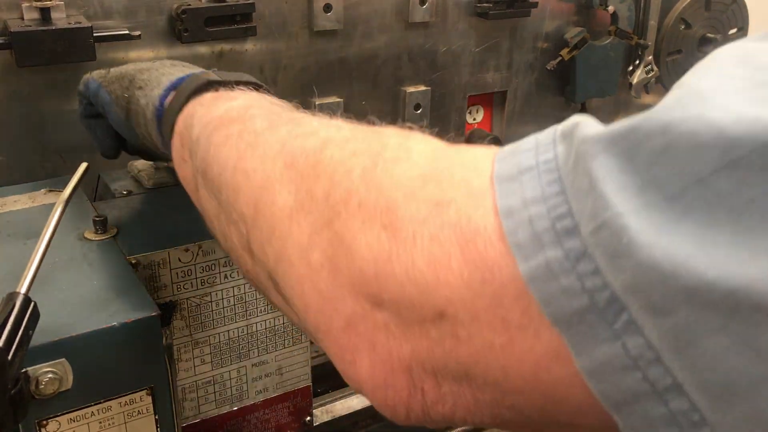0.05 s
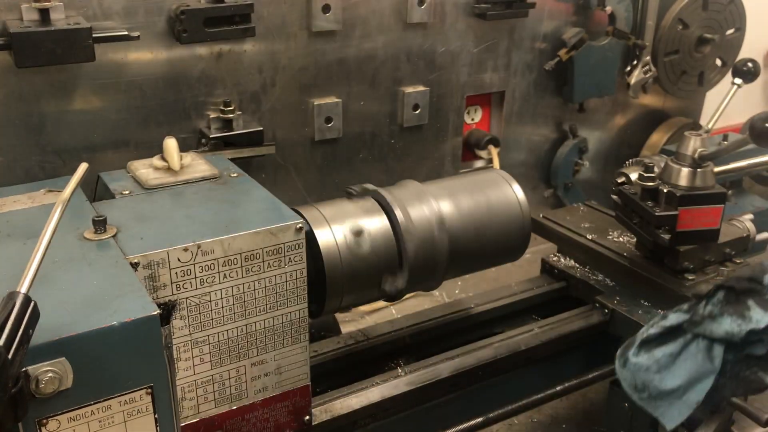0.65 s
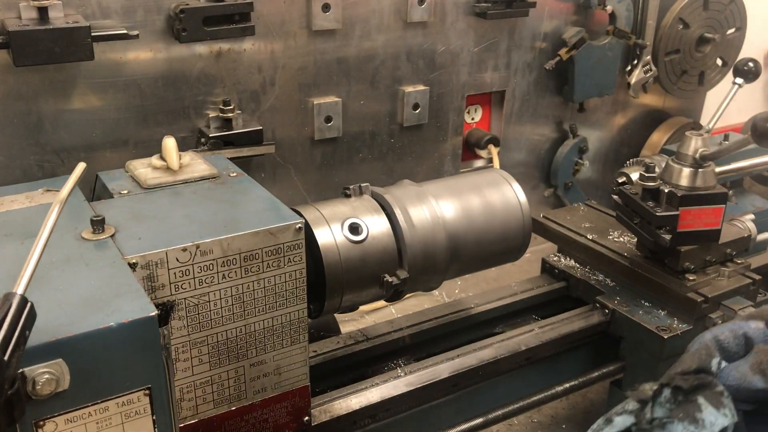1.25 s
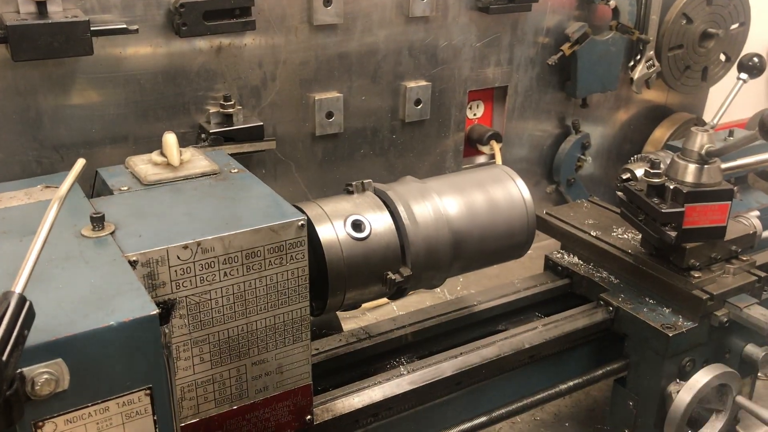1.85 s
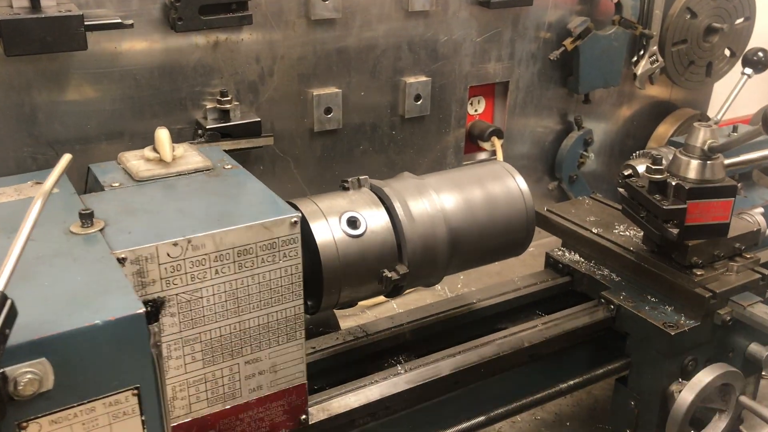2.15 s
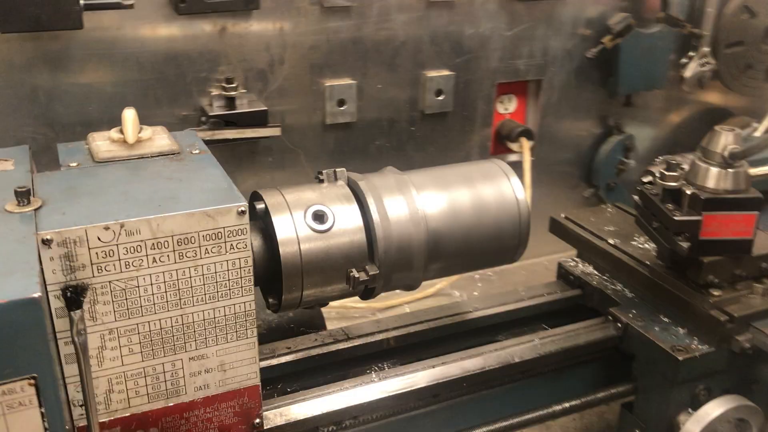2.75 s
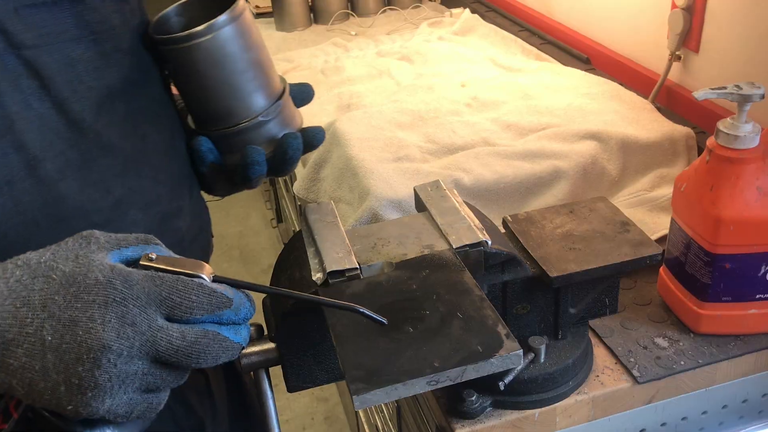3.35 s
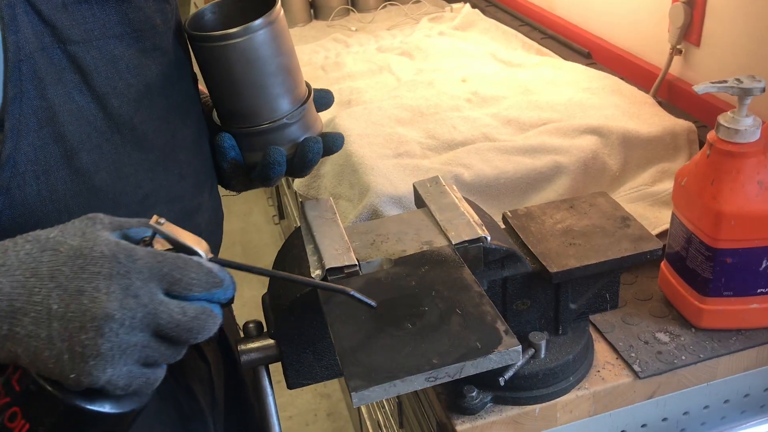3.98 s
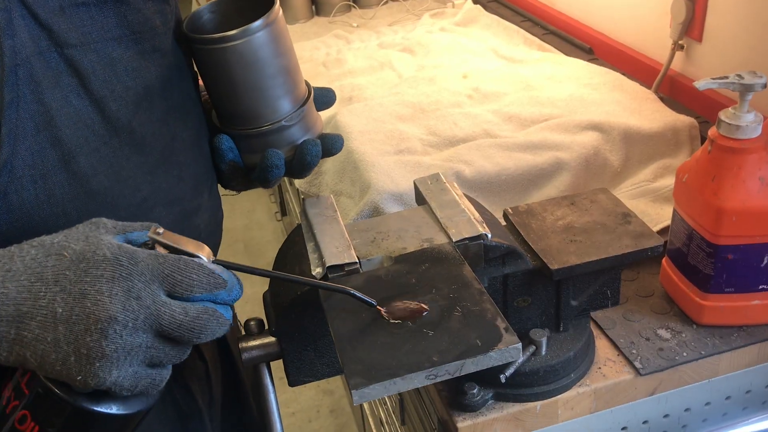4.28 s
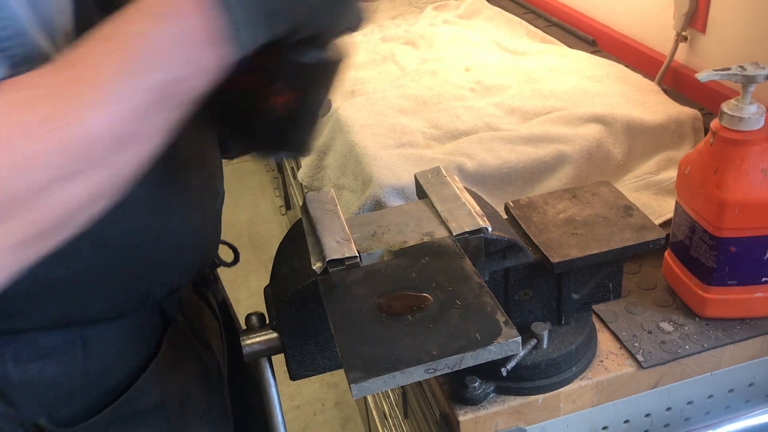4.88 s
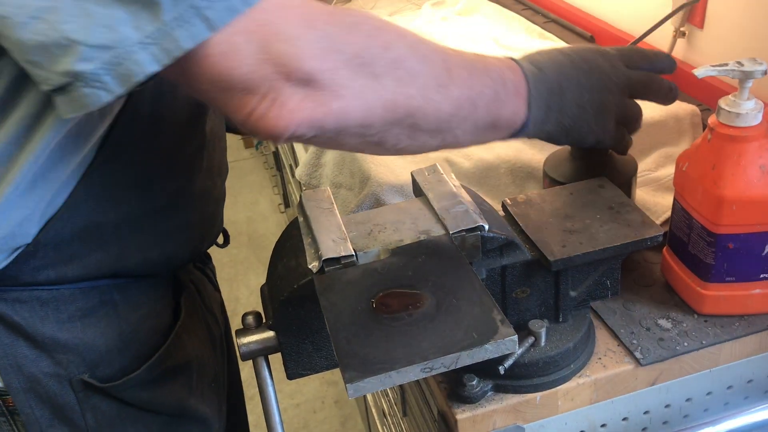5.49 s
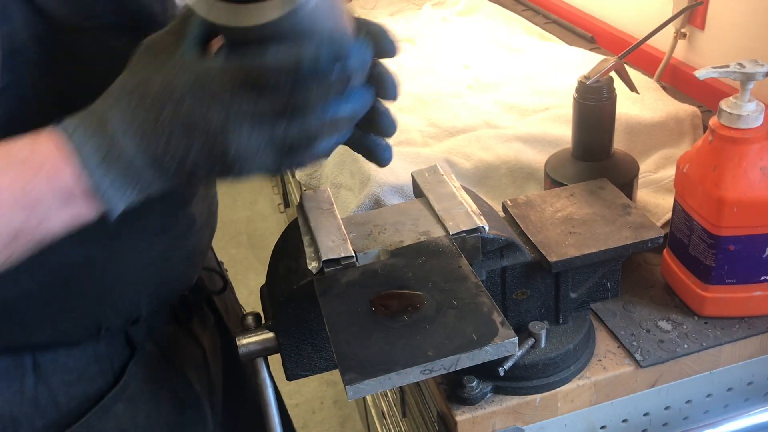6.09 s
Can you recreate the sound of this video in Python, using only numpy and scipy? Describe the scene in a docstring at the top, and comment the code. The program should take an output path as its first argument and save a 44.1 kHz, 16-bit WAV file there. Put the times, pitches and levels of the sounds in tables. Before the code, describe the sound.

Lathe gears slow from a whine to a fading drone, with light clinks and one metallic clack. After some quiet clothing rustle and padded knocks, the lever of a nearby oil can gives three sharp, tinny snaps, with a brief sputter of oil before the last. Muffled handling knocks follow, then a thud as the can lands on steel. A low rumble and faint hiss fill the small workshop.

```python
"""Lathe run-down and oil can.

A metal lathe coasts to a stop in a small workshop: gear teeth rattle the headstock, a steel part clacks.
Work clothes rustle. At the bench a pump oil can snaps three times and spits oil, is shifted in a gloved
hand and set down on steel with a faint ring. A low rumble lies under it all."""
import sys
import numpy as np
from scipy import signal
from scipy.fft import rfft, irfft, next_fast_len
from scipy.io import wavfile
from scipy.ndimage import uniform_filter1d

SR = 44100
rng = np.random.default_rng(int(sys.argv[2]) if len(sys.argv) > 2 else 0)


def pcm_store(signal):
    """Save signal as 16-bit PCM."""
    levels = np.round(np.clip(np.atleast_2d(signal), -1, 1) * 32767)
    wavfile.write(sys.argv[1], SR, levels.astype(np.int16).T)


N = 274729
T = np.arange(N) / SR
AGE = T[:SR // 2]  # seconds since an event began


def undb(db):
    """Decibels to gain."""
    return 10 ** (np.asarray(db) / 20)


def unit(x):
    """Scale to rms 1."""
    return x / np.sqrt(np.mean(x ** 2))


def add(out, start_s, x):
    """Mix a sound in at a given time."""
    i = int(start_s * SR)
    out[i:i + len(x)] += x[:N - i]


def colour(x, points):
    """Minimum-phase filter of unit power through (Hz, dB) points."""
    size = next_fast_len(2 * len(x))
    hz, db = np.transpose(points)
    bins_hz = np.maximum(np.arange(size // 2 + 1) * SR / size, 1)
    gain = unit(undb(np.interp(np.log(bins_hz), np.log(hz), db)))
    cepstrum = irfft(np.log(gain), size)
    cepstrum[1:size // 2] *= 2
    cepstrum[size // 2 + 1:] = 0
    return irfft(rfft(x, size) * np.exp(rfft(cepstrum)), size)[:len(x)]


def split(x, hz):
    """The parts of a sound below and above a frequency."""
    low = signal.sosfiltfilt(signal.butter(2, hz, fs=SR, output="sos"), x, padtype=None)
    return low, x - low


def resonate(x, hz, width_hz):
    """One resonance, gain 1 at its centre."""
    return signal.lfilter(*signal.iirpeak(hz, hz / width_hz, fs=SR), x)


def ring(modes, tuning=1, jitter=0.00079):
    """Struck (Hz, dB, t60 s) modes; neighbours swing in opposite senses, so the ring builds briefly."""
    detune = tuning * (1 + jitter * rng.standard_normal(len(modes)))
    out = 0
    for k, (hz, db, t60_s) in enumerate(modes):
        decay = np.exp(-np.log(1000) * AGE / t60_s)
        out += (-1) ** k * undb(db) * np.sin(2 * np.pi * hz * detune[k] * AGE) * decay
    return out


def burst(decay_s):
    """A rush of tiny contacts that dies away."""
    return rng.standard_normal(len(AGE)) * np.exp(-AGE / decay_s)


def walk(per_s):
    """Smooth random drift with a spread near 1."""
    knots = rng.standard_normal(N // 50)
    return uniform_filter1d(np.interp(T * per_s, np.arange(len(knots)), knots), size=200)


def grains(per_s, spread_db):
    """Random clicks of unequal size, rms 1."""
    clicks = (rng.random(N) < per_s / SR) * rng.standard_normal(N)
    return unit(clicks * undb(spread_db * rng.standard_normal(N)))


def gate(start_s, end_s, fade_s):
    """1 between two times, fading outside them."""
    return np.clip(1 + np.minimum(T - start_s, end_s - T) / fade_s, 0, 1)


def scatter(start_s, end_s, per_s, spread_db):
    """Loosely spaced events of unequal size, as (s, dB) rows."""
    gaps, sizes = rng.standard_normal((40, 2)).T
    times = start_s + np.cumsum(np.exp(0.35 * gaps)) / per_s
    return [(s, spread_db * size) for s, size in zip(times, sizes) if s < end_s]


def room(x, near_db, far_db, near_t60_s=0.071, far_t60_s=1.0, treble_t60_s=0.18, gap_s=0.0032):
    """Quick reflections from nearby surfaces, then the workshop's tail, whose treble dies first."""
    low, high = split(rng.standard_normal(len(AGE)), 5000)
    fall = -np.log(1000) * AGE
    near = rng.standard_normal(len(AGE)) * np.exp(fall / near_t60_s) * (AGE > gap_s)
    far = (low * np.exp(fall / far_t60_s) + high * np.exp(fall / treble_t60_s)) * (AGE > 2 * gap_s)
    echoes = (undb(near_db) * unit(near) + undb(far_db) * unit(far)) / np.sqrt(len(AGE))
    return x + signal.fftconvolve(x, echoes)[:N]


# Spectra of rumble, low flutter and shop hiss. Each row: frequency in Hz, relative density in dB.
RUMBLE_SPECTRUM = [(8, -14), (16, 11.5), (28, 2), (55, -6.5), (85, -10), (130, -21.5), (220, -24.5),
                   (320, -45.5), (2000, -110)]
FLUTTER_SPECTRUM = [(12, -16), (28, 0), (55, -2), (90, -6), (130, -10.5), (200, -25), (400, -58),
                    (2000, -110)]
HISS_SPECTRUM = [(88, -30), (150, -18), (159, -9.5), (361, -8), (406, -14.5), (821, -12), (1040, -17.5),
                 (13400, -40), (14800, -54)]
# Spells of moving about. Each row: start and end in seconds, cloth rustle in dB, flutter in dB.
MOVING = [(0, 1.456, -66, -56), (1.542, 3.207, -62, -51), (4.62, 6.23, -59, -53.5)]


def background():
    """A deep unsteady rumble, fuller while someone moves, under the faint hiss of the shop."""
    rumble = unit(colour(rng.standard_normal(N), RUMBLE_SPECTRUM)) * undb(-45.5 + 3 * walk(per_s=3.1))
    moving = sum(undb(db) * gate(start_s, end_s, fade_s=0.087) for start_s, end_s, _, db in MOVING)
    flutter = unit(colour(rng.standard_normal(N), FLUTTER_SPECTRUM)) * moving
    hiss = unit(colour(rng.standard_normal(N), HISS_SPECTRUM)) * undb(-66.5 + 0.6 * walk(per_s=4.3))
    return rumble + flutter + hiss


# Arm movements. Each row: peak time in seconds, level in dB, build-up in seconds, relative swish in dB.
GESTURES = [(1.03, -57.5, 0.2, -21), (1.849, -41.5, 0.12, -18.5), (2.4, -55.5, 0.11, -18),
            (2.668, -49, 0.079, -14), (3.12, -58, 0.13, -11), (4.82, -67, 0.045, 5.5),
            (4.94, -47.5, 0.061, -19), (5.142, -44.5, 0.049, -16.5), (5.27, -56.5, 0.073, -11.5),
            (5.61, -55.5, 0.064, -12.5), (5.785, -48.5, 0.053, -23), (5.987, -45.5, 0.058, -12),
            (6.21, -56, 0.12, -7.5)]
# Rubbing fabric. Each row: frequency in Hz, relative density in dB.
CLOTH_SPECTRUM = [(60, -16.5), (130, 3.5), (260, -3), (600, -9.5), (1200, -17.5), (3500, -28),
                  (8000, -39.5), (15000, -56)]


def cloth():
    """Fibres catch and let go in dense grains, a soft swish above; each arm movement builds and settles."""
    settle_ratio, roundness = 0.47, 1.08  # fall time over build-up; 1 is pointed, 2 a bell
    rub = sum(undb(db) * gate(start_s, end_s, fade_s=0.073) for start_s, end_s, db, _ in MOVING)
    swish = undb(-14) * rub
    for peak_s, db, build_s, swish_db in GESTURES:
        from_peak = np.maximum(peak_s - T, (T - peak_s) / settle_ratio) / build_s
        swell = undb(db) * np.exp(-from_peak ** roundness)
        rub = np.hypot(rub, swell)
        swish = np.hypot(swish, undb(swish_db) * swell)
    fibres = grains(per_s=3000, spread_db=1.5) * undb(2 * walk(per_s=55))
    low, high = split(colour(fibres, CLOTH_SPECTRUM), 1530)
    return rub * unit(low) + swish * unit(high)


# Knocks of glove and can. Each row: start in seconds, level in dB, contact in seconds, relative scuff in dB.
BUMPS = [(1.69, -39, 0.0014, -7.5), (1.788, -38, 0.00052, -20), (1.885, -30, 0.00073, -15.5),
         (1.906, -36, 0.00049, -25), (2.467, -44.5, 0.00057, -12.5), (4.954, -30, 0.0008, -11),
         (5.1089, -27, 0.00089, -12), (5.1156, -30.5, 0.00077, -8), (5.203, -30.5, 0.00055, -16.5),
         (5.281, -37, 0.00091, -27), (5.3442, -40, 0.00029, -4.5), (5.3505, -27.5, .0005, -22),
         (5.367, -16, .001, -29), (5.377, -28, 0.0004, -17), (5.785, -38, 0.00123, -22),
         (5.972, -32.5, 0.00047, -23)]


def bumps():
    """Padded contacts: one push and rebound, a low thud, a short dull shudder and a scuff of fabric."""
    shudder_spectrum = [(120, -8), (300, 3), (600, 8), (900, -6.5), (1600, -29), (6000, -58)]
    scuff_spectrum = [(200, 6), (900, 5), (3500, -5), (7000, -18.5), (15000, -38)]
    out = np.zeros(N)
    for start_s, db, contact_s, scuff_db in BUMPS:
        pulse_time = AGE / contact_s - 2
        push = -2 * pulse_time * np.exp(-pulse_time ** 2)
        thud = ring([(108.6, -9.5, 0.089), (184, -16.5, 0.037)])
        shudder = undb(-6.5) * colour(burst(decay_s=0.0032), shudder_spectrum)
        scuff = undb(scuff_db) * colour(burst(decay_s=0.0043), scuff_spectrum)
        add(out, start_s, undb(db) * (push + thud + shudder + scuff))
    return out


# Steel under the can. Each row: frequency in Hz, level in dB, t60 in seconds.
STEEL_MODES = [(1022, 6, 0.28), (1090, -1, 0.14), (1180, -11.5, 0.74), (2000, -14, 0.45), (3365, -27, 0.27),
               (3520, -14, 0.33)]


def set_down(start_s=5.4235, rise_s=0.0058):
    """The can's rim scrapes onto the steel, which rings faintly."""
    rim_spectrum = [(500, -22), (1500, -8), (2900, 4), (5000, -10), (8000, -22), (9700, -17), (14000, -34)]
    scrape = undb(-47) * colour(burst(decay_s=0.011), rim_spectrum)
    steel = undb(-49) * ring(STEEL_MODES) * (1 - np.exp(-AGE / rise_s))
    out = np.zeros(N)
    add(out, start_s, scrape + steel)
    return out


# Large air pockets. Each row: start in seconds, level in dB, decay in seconds.
SPITS = [(4.2236, -34.5, 0.011), (4.249, -32, 0.0045), (4.322, -35, 0.0031)]
# Spitting spout. Each row: frequency in Hz, relative density in dB.
SPIT_SPECTRUM = [(180, -20.5), (300, -2.5), (624, -19), (946, -11), (2250, -13), (3640, -4), (5520, -13.5),
                 (6960, -7), (8220, -19), (11300, -22), (16000, -38)]


def spits(sputter_db=-49):
    """Air pockets burst at the spout as oil comes out: a few large ones amid a sputter of small ones."""
    out = np.zeros(N)
    for start_s, db, decay_s in SPITS:
        add(out, start_s, undb(db) * burst(decay_s))
    pop = burst(decay_s=0.0034)
    for start_s, size_db in scatter(start_s=4.23, end_s=4.35, per_s=110, spread_db=1.5):
        add(out, start_s, undb(sputter_db + size_db) * pop)
    return colour(out, SPIT_SPECTRUM)


# Plunger sliding in its barrel. Each row: start and end in seconds, level in dB.
SLIDES = [(3.541, 3.616, -53.5), (3.679, 3.73, -54), (3.927, 4.016, -53.5), (4.075, 4.11, -50.5),
          (4.395, 4.423, -45)]
# Lever catching as a stroke begins. Each row: start in seconds, level in dB, relative treble in dB.
LEVER_CATCHES = [(3.5365, -48.5, -2), (3.6905, -39, -4.5), (3.9315, -37.5, -6.5)]
# Spectra of scrape and tick. Each row: frequency in Hz, relative density in dB.
SLIDE_SPECTRUM = [(200, -21.5), (300, 3), (700, -14), (1100, 2.5), (2100, -15), (3100, -3.5), (3900, 3.5),
                  (5000, -36), (7000, -22.5), (15000, -41.5)]
TICK_SPECTRUM = [(250, -28.5), (700, -12), (1100, -15), (2100, -12.5), (3500, -0.5), (4200, -3.5),
                 (5600, -12), (7000, -8.5), (8800, -24.5), (10500, -18), (11500, -27), (15000, -30)]


def pump(spring_over_slide_db=3.5, spring_treble_db=-4.5, fade_s=0.0056):
    """The plunger scrapes along in tiny slips while the lever catches and the spring ticks."""
    stroke, ticks, catches = np.zeros(N), np.zeros(N), list(LEVER_CATCHES)
    for start_s, end_s, db in SLIDES:
        stroke += undb(db) * np.clip(np.minimum(T - start_s, end_s - T) / fade_s, 0, 1)
        for tick_s, size_db in scatter(start_s, end_s, per_s=46, spread_db=1.5):
            catches.append((tick_s, db + spring_over_slide_db + size_db, spring_treble_db))
    low, high = split(colour(burst(decay_s=0.0056), TICK_SPECTRUM), 5450)
    for start_s, db, treble_db in catches:
        add(ticks, start_s, undb(db) * (low + undb(treble_db) * high))
    slips = unit(colour(grains(per_s=2500, spread_db=8), SLIDE_SPECTRUM))
    return ticks + stroke * slips


# Lever snaps. Each row: start in seconds, level in dB, relative boom in dB, tuning ratio.
SNAPS = [(3.716, -16, 2.5, 1.008), (4.1010, -12, -1.5, 0.98), (4.4134, -11.5, 1, .998)]
# The can's bottom, spout and lever. Each row: frequency in Hz, level in dB, t60 in seconds.
CAN_MODES = [(250, -22.5, 0.15), (286, -10.5, 0.17), (338.3, -13, 0.081), (385, -15.5, 0.06),
             (447.7, -19, 0.095), (708, -22.5, 0.031), (920, -18, 0.047), (1055, -20, .06),
             (1330, -36.5, 0.052), (2205, -24, 0.03), (2710, -19.5, 0.043), (3017, -11, 0.033),
             (3410, -7, 0.02), (3726, -1.5, 0.039), (3944, -3, .022), (4290, -13, 0.053),
             (4610, -24, 0.054), (5660, -27.5, 0.028), (6420, -11.5, .028), (6900, -18.5, 0.032),
             (7270, -19.5, 0.03), (9330, -24.5, 0.023), (10060, -23, 0.019)]
# Spectra of the impact and of loose parts. Each row: frequency in Hz, relative density in dB.
CRACK_SPECTRUM = [(190, -28), (330, -0.5), (1000, -7.5), (1800, -20), (3600, 6), (5000, -1), (7000, -9),
                  (10000, -13.5), (15000, -31.5)]
SHIVER_SPECTRUM = [(290, -37.5), (500, 7), (766, -9.5), (1130, 2.5), (1470, -15.5), (1800, -9),
                   (2430, -15.5), (2570, -3), (3230, -15), (3880, -6), (4600, -14.5), (6480, -14),
                   (7910, -33), (9510, -28.5), (15000, -60.5)]


def oil_can():
    """The lever hits its stop: spout and lever ring, the thin bottom booms, loose parts shiver on."""
    out = np.zeros(N)
    for start_s, db, boom_db, tuning in SNAPS:
        crack = undb(-13.5) * colour(burst(decay_s=0.0069), CRACK_SPECTRUM)
        shiver = undb(-15.5) * colour(burst(decay_s=0.022), SHIVER_SPECTRUM)
        bottom, lever = split(ring(CAN_MODES, tuning, jitter=0.002) + crack + shiver, 650)
        add(out, start_s, undb(db) * (undb(boom_db) * bottom + lever))
    return out


# Squeaks and clinks in the lathe.
# Each row: start in seconds, level in dB, frequency in Hz, bandwidth in Hz, decay in seconds.
CLINKS = [(0.254, -56, 7100, 400, 0.008), (0.302, -53.5, 7080, 200, .01), (0.552, -54, 4500, 120, 0.019),
          (0.622, -44.5, 6560, 600, 0.018), (.7595, -41.5, 3340, 700, 0.0048),
          (0.762, -45.5, 1120, 300, 0.0072), (0.784, -68, 2950, 40, 0.11),
          (0.897, -53.5, 2600, 900, 0.0035)]


def clinks():
    """Small steel parts touch or rub, each sounding one note."""
    out = np.zeros(N)
    for start_s, db, hz, width_hz, decay_s in CLINKS:
        note = resonate(resonate(burst(decay_s), hz, width_hz), hz, hz / 2)
        makeup_gain = np.sqrt(SR / (np.pi * width_hz))
        add(out, start_s, undb(db) * makeup_gain * note)
    return out


# Clacks of the halting spindle. Each row: start in seconds, level in dB, rattle decay in seconds.
CLACKS = [(0.632, -25.5, 0.011), (0.641, -38.5, 0.014)]
# Rattle of the loose parts. Each row: frequency in Hz, relative density in dB.
CLACK_SPECTRUM = [(600, -36), (950, 3.5), (1600, -1), (2100, 7), (2500, 0.5), (3500, -0.5), (4900, -3),
                  (5900, 3), (7200, -1.5), (8000, -8.5), (16000, -39)]
# Their ring. Each row: frequency in Hz, level in dB, t60 in seconds.
CLACK_MODES = [(997, -14.5, 0.18), (2030, -16, 0.061), (2068, 1.5, 0.061), (2910, -25, .1),
               (3474, -4, 0.044), (3870, -21, 0.098), (4740, -27, 0.088), (6000, -15, 0.055),
               (6665, -20, .07), (6970, -10, 0.047)]


def clacks(rise_s=0.0021):
    """Loose steel parts rattle briefly and ring as the spindle runs down."""
    out = np.zeros(N)
    for start_s, db, decay_s in CLACKS:
        clack = colour(burst(decay_s), CLACK_SPECTRUM) + ring(CLACK_MODES)
        add(out, start_s, undb(db) * clack * (1 - np.exp(-AGE / rise_s)))
    return out


# Fixed notes of the running lathe: low electric hum tones and ringing headstock resonances.
# Each row: frequency in Hz, level in dB.
LATHE_NOTES = [(120, -10.5), (236, -8.5), (328, -7.5), (359, -3), (479, -10), (572, -2), (730, -9.5),
               (776, -22), (945, 0.5), (1131, -13.5), (1477, -30), (1840, 0), (1902, 2.5), (2089, -12),
               (2256, -5), (2305, -3.5), (2590, -12), (2970, -14), (3520, -17), (3860, -20.5)]
# Broad response of the casting. Each row: frequency in Hz, relative density in dB.
CASTING_SPECTRUM = [(100, -17), (200, -2), (270, -4), (330, 1.5), (410, -1), (550, 1.5), (900, -2),
                    (1250, -10), (1650, -6.5), (1900, -7), (2700, -20.5), (3900, -18), (4600, -27.5),
                    (7200, -34), (14000, -60)]


def hum_and_ring(force):
    """Narrow bands of the force give hum tones and headstock ring, each wavering, over the casting."""
    notes = 0
    for hz, db in LATHE_NOTES:
        width_hz = 26 + hz / 70
        band = resonate(resonate(force, hz, width_hz), hz, width_hz)
        notes += undb(db + 2 * walk(per_s=11.8)) * band
    return unit(notes) + undb(-1) * unit(colour(force, CASTING_SPECTRUM))


def lathe(full_mesh_hz=384.6, rest_s=1.06):
    """Friction slows the gears evenly to rest; their teeth strike unevenly and chatter in the backlash."""
    rattle_hz, scatter_s = 117, 0.001  # the rattle fades below this mesh rate; smear of one blow
    gear_teeth, tight_tooth, tight_swell_db = 50.7, 17, 1  # one gear runs tight once a turn
    speed = np.maximum(1 - T / rest_s, 1e-4)
    mesh_hz = full_mesh_hz * speed
    teeth = np.cumsum(mesh_hz * (1 + 0.04 * walk(per_s=110))) / SR
    contacts = np.diff(np.floor(teeth), prepend=0)
    strikes = unit(contacts / np.sqrt(mesh_hz + rattle_hz) * rng.random(N)) * np.sqrt(rest_s * SR / N)
    # each blow scatters through shafts and oil before it reaches the casing
    smear = signal.fftconvolve(strikes, np.exp(-AGE / scatter_s))[:N] / np.sqrt(scatter_s * SR / 2)
    blows = smear * rng.standard_normal(N)
    backlash = undb(4) * grains(per_s=9000, spread_db=1)
    low, high = split(hum_and_ring(undb(-6) * strikes + blows + backlash), 800)
    bass, mid = split(low, 380)
    tight_db = tight_swell_db * np.cos(2 * np.pi * (teeth - tight_tooth) / gear_teeth)
    # slower teeth hit more softly: the whine goes first, the drone last
    whine = undb(-34) * speed ** 1.96 * unit(high)
    growl = undb(-40 + tight_db) * speed * unit(mid)
    drone = undb(-44) * speed ** 0.12 * unit(bass)
    rattling = mesh_hz ** 2 / np.hypot(mesh_hz ** 2, rattle_hz ** 2)
    return rattling * (drone + growl + whine)


def scene(right_over_left_db=3):
    """The lathe stands further off, the bench is close; one signal feeds both channels."""
    gears = room(lathe(), near_db=-14, far_db=-23, far_t60_s=0.99)
    parts = room(clacks() + clinks(), near_db=-10.5, far_db=-17.5, far_t60_s=0.73, treble_t60_s=0.44)
    can = room(oil_can(), near_db=-18.5, far_db=-19.5, near_t60_s=0.074, far_t60_s=0.43, treble_t60_s=0.27)
    pumping = room(pump() + spits(), near_db=-10.5, far_db=-20.5)
    handling = room(bumps() + set_down(), near_db=-13, far_db=-44)
    mono = gears + parts + can + pumping + handling + cloth() + background()
    sides = undb(np.array([[-right_over_left_db], [right_over_left_db]]) / 2)
    return mono * sides / sides.mean()


def record(dry):
    """Steep low-pass at 15.8 kHz."""
    return signal.sosfilt(signal.ellip(8, 0.2, 70, 15800, fs=SR, output="sos"), dry)


dry = scene()
out = record(dry)
pcm_store(out)
```